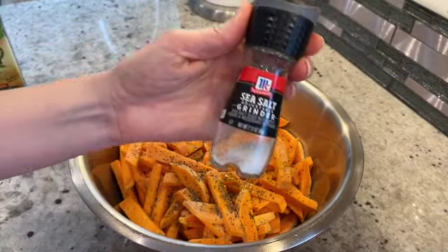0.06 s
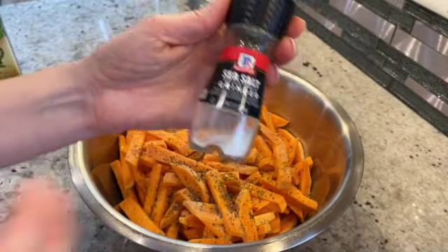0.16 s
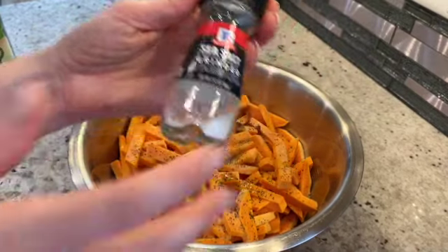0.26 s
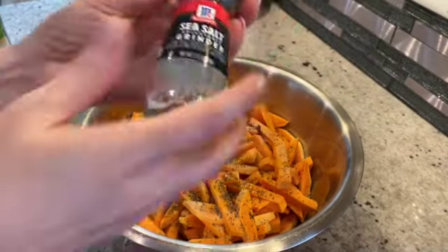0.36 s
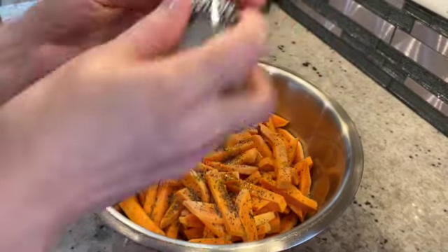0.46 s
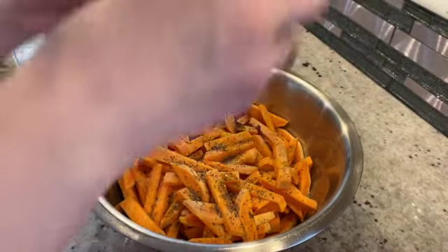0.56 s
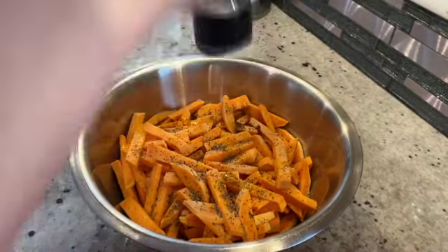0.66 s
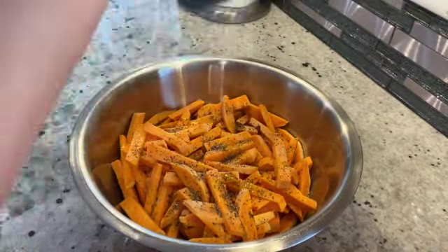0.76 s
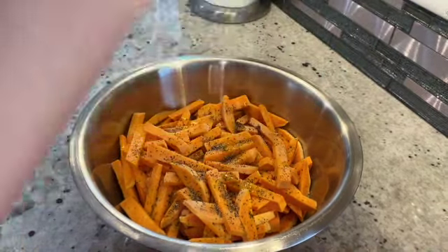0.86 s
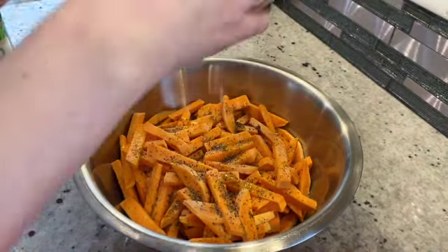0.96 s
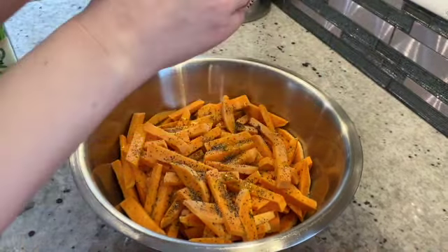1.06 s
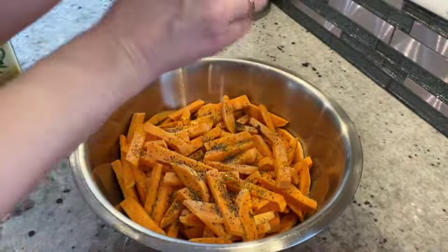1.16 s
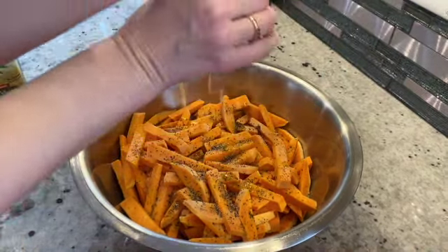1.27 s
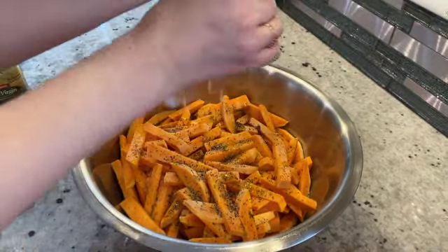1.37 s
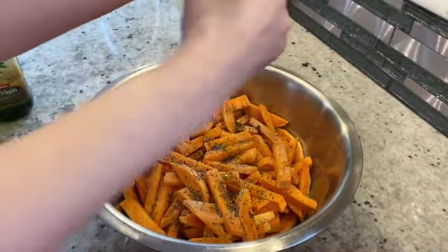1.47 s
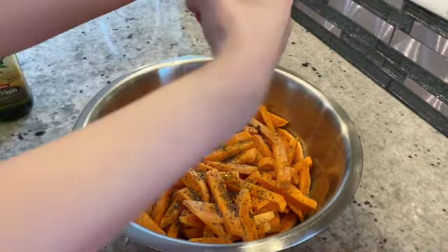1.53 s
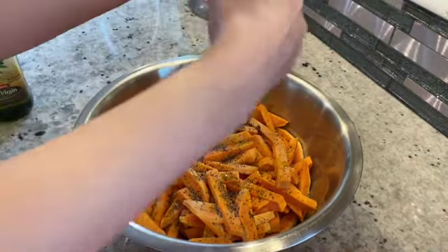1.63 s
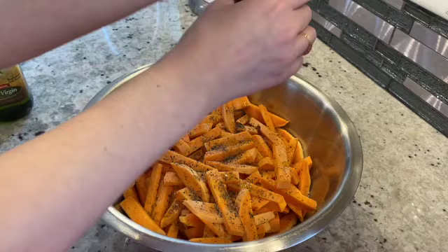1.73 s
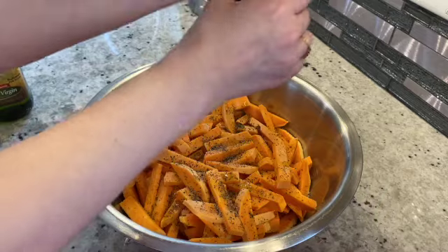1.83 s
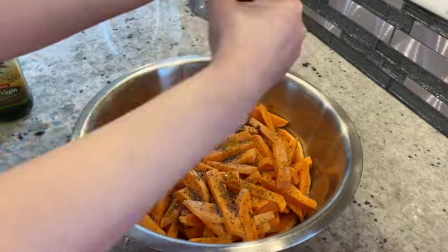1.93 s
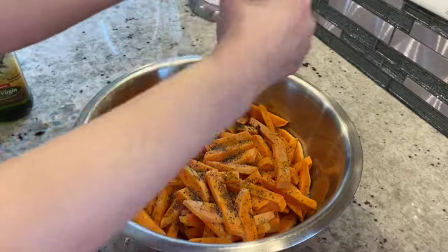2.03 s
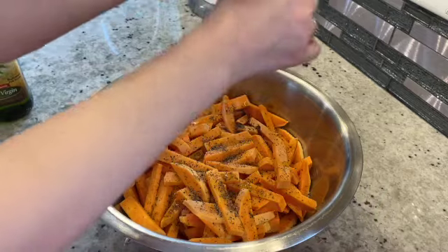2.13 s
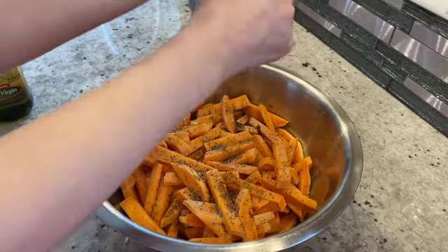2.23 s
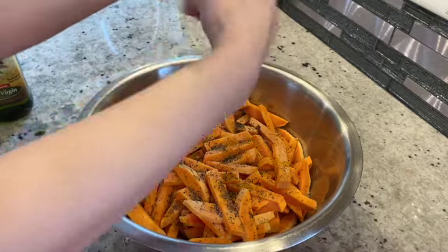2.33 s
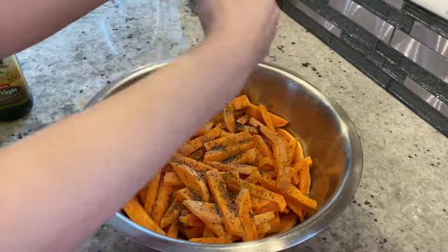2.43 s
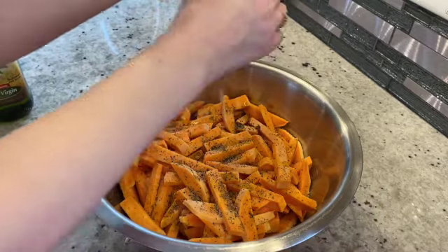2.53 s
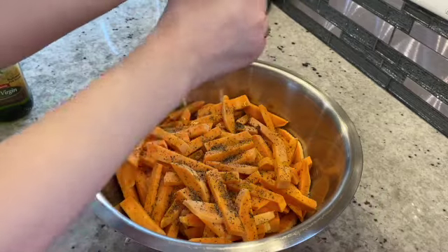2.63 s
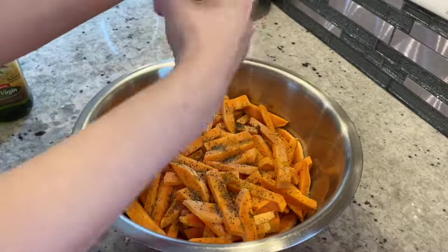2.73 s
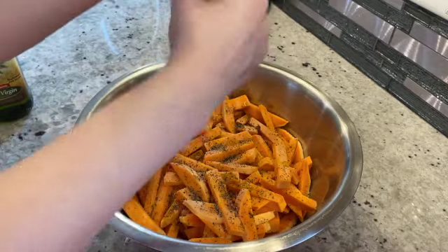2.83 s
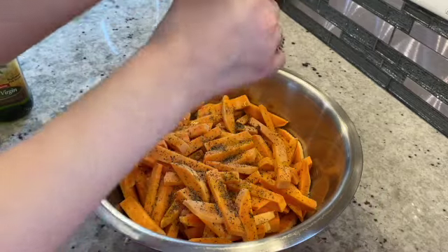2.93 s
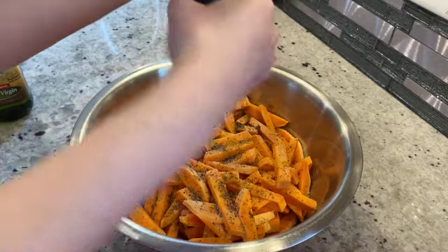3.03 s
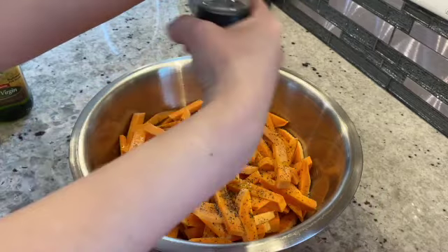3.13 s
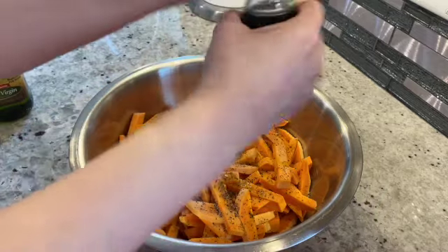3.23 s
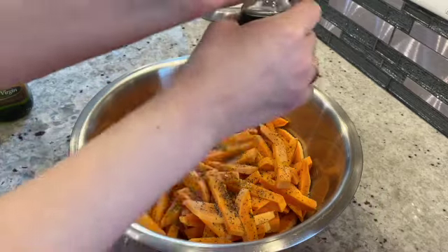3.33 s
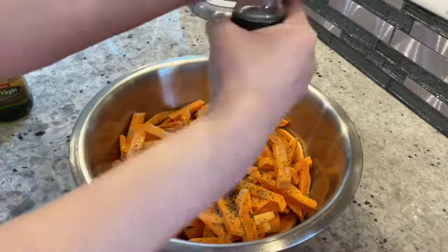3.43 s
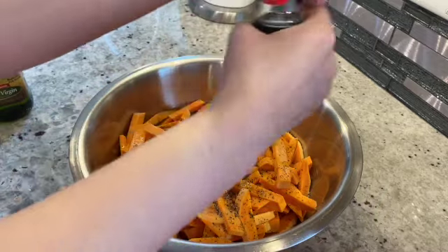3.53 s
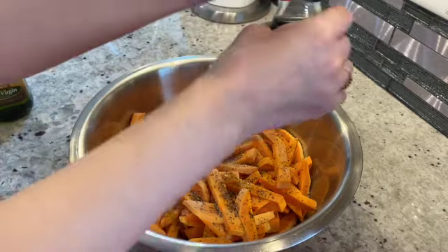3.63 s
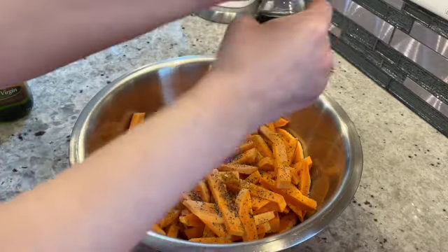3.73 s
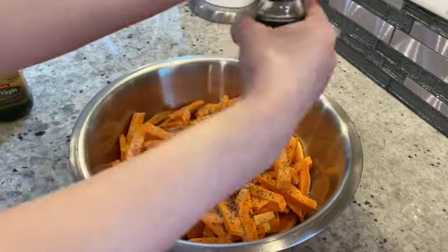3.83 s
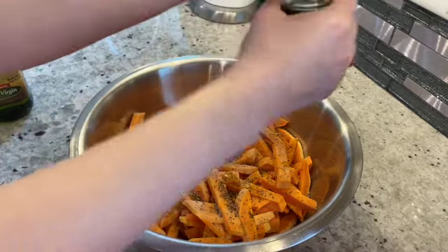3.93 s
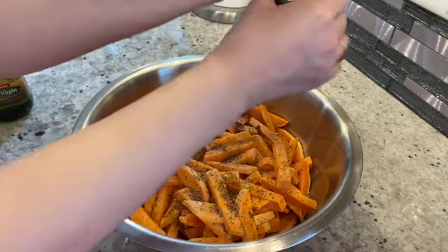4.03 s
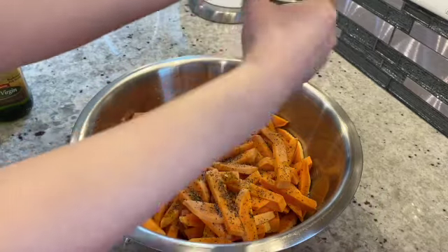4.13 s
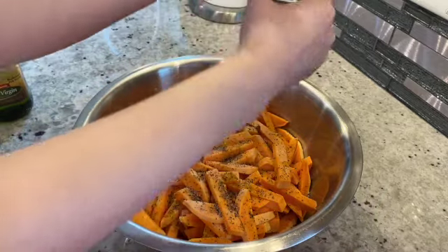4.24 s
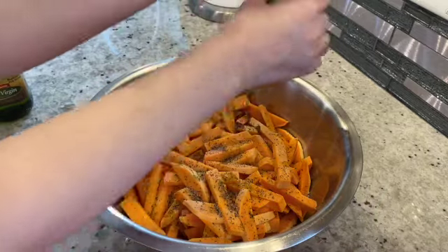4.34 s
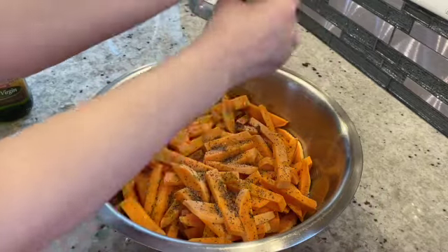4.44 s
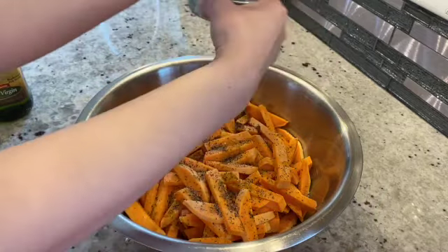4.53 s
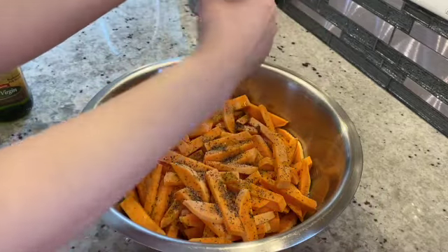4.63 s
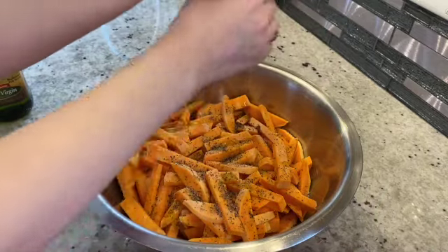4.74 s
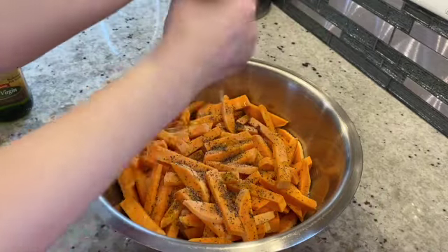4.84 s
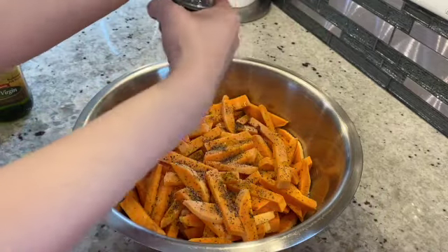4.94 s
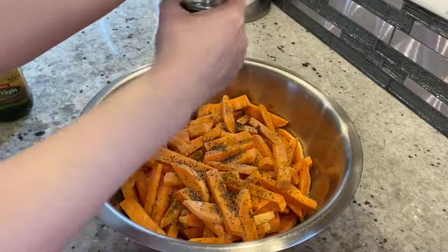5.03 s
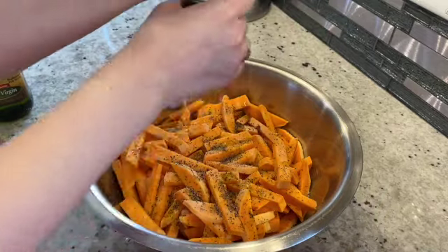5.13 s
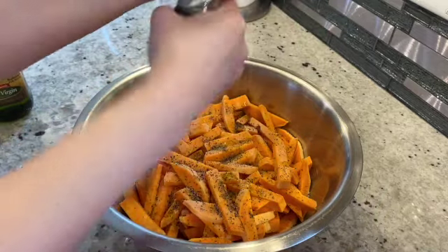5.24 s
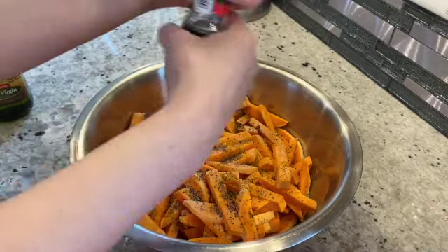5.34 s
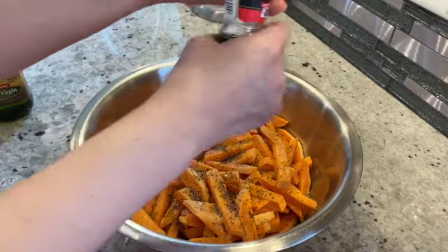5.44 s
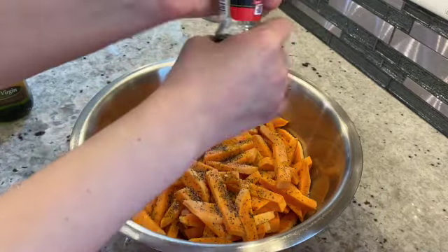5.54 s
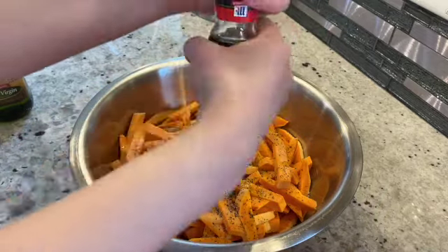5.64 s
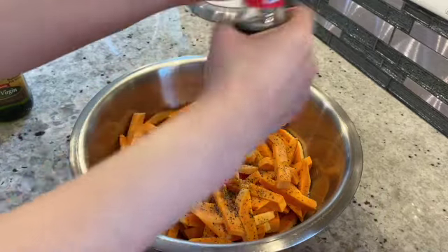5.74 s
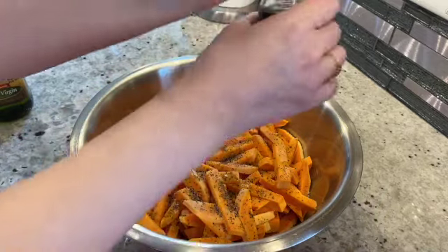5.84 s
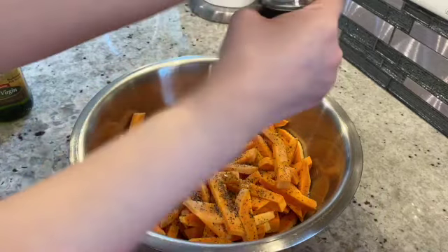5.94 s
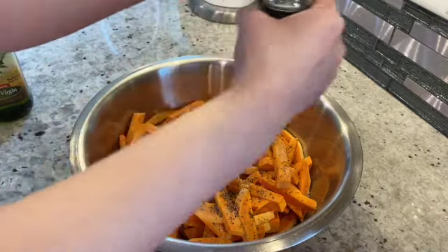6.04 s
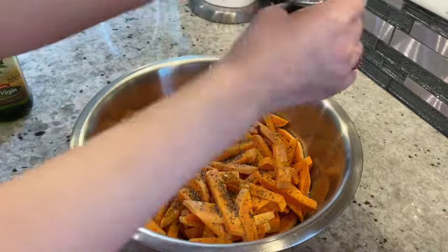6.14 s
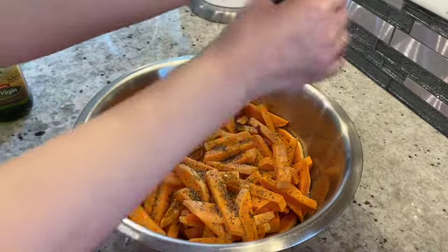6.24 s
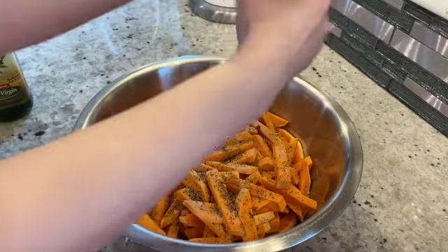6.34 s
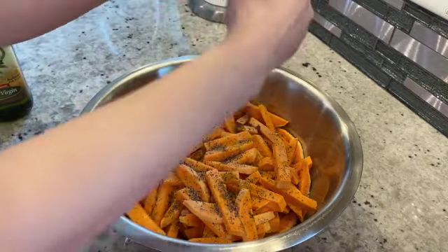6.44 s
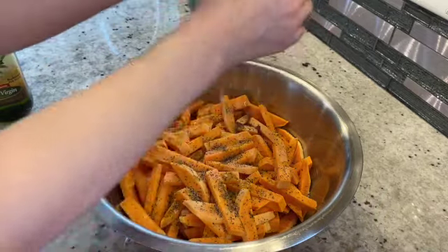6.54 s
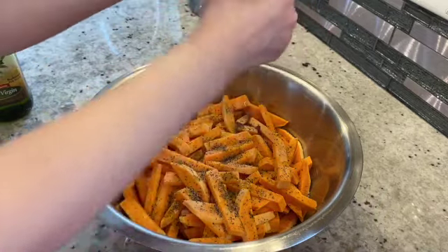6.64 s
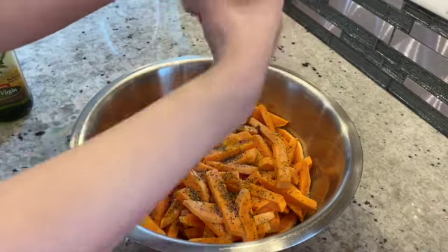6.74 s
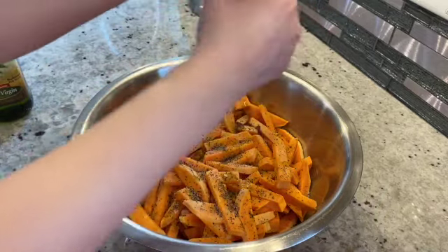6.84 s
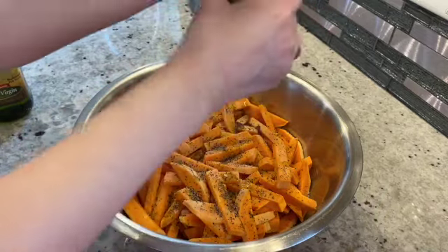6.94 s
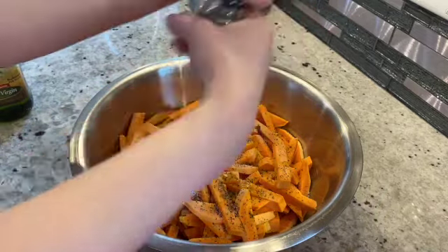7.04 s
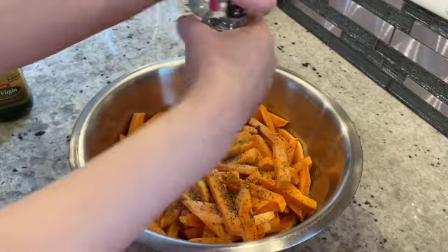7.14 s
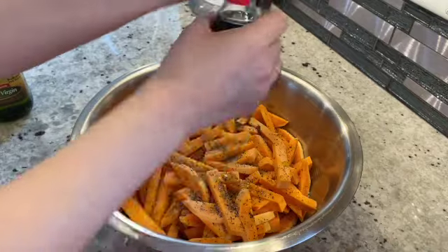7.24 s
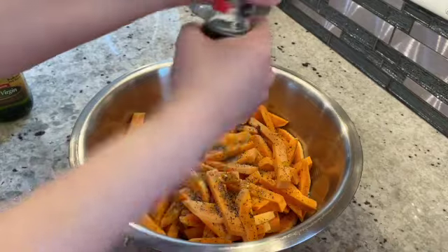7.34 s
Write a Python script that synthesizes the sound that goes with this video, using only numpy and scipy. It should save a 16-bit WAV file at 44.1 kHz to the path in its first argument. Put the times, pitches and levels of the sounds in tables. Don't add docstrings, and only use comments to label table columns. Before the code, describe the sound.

After a brief quiet moment and a rush of loose salt, a hand grinder rasps about three times a second over a low appliance hum.

```python
import sys
import numpy as np
from scipy import signal
from scipy.fft import rfft, irfft, next_fast_len
from scipy.io import wavfile
from scipy.ndimage import uniform_filter1d

SR = 44100
rng = np.random.default_rng(int(sys.argv[2]) if len(sys.argv) > 2 else 0)


def attenuation_scalar(level_db):
    decades = np.asarray(level_db, float) / 20
    return 10 ** decades


def unload_audio(sound):
    columns = np.transpose(np.atleast_2d(sound))
    steps = np.round(np.clip(columns, -1, 1) * 32767)
    wavfile.write(sys.argv[1], SR, steps.astype(np.int16))


N = 325899


def evened(x):
    return x / np.sqrt(np.mean(x ** 2) + 1e-20)


def read(points, hz, column=1):
    table = np.transpose(points)
    return np.interp(np.log(hz + 1), np.log(table[0] + 1), table[column])


def add(mix, s, sound):
    part = mix[..., round(s * SR):][..., :sound.shape[-1]]
    part += sound[..., :part.shape[-1]]


def resonate(x, hz, width_hz):
    return signal.lfilter(*signal.iirpeak(hz, hz / width_hz, SR), x)


def butter(kind, order, hz):
    return signal.butter(order, hz, kind, fs=SR, output="sos")


def coloured(x, db):
    log_gain = np.log(attenuation_scalar(np.r_[db, db[-2:0:-1]]))
    taps = np.fft.ifft(np.exp(np.conj(signal.hilbert(log_gain)))).real[:2048]
    return signal.oaconvolve(x, taps)[:N]


def drift(per_s):
    span = int(SR / per_s)
    return evened(uniform_filter1d(uniform_filter1d(rng.standard_normal(N), span), span))


def grains(per_s, spread_db, slips_per_s, slip_s, slip):
    slips = np.minimum(rng.exponential(1, N), 2) * (rng.random(N) < slips_per_s / SR)
    clumps = 1 + slip * signal.lfilter([1], [1, -np.exp(-1 / (slip_s * SR))], slips)
    size = attenuation_scalar(spread_db * np.minimum(rng.exponential(1, N), 4)) * clumps
    return evened(size * rng.standard_normal(N) * (rng.random(N) < per_s / SR))


def scatter(length):
    taps, at = np.zeros((2, length)), np.arange(20, length - 20, 20)
    at = at + rng.integers(0, 20, (2, len(at)))
    np.put_along_axis(taps, at, rng.choice([-1., 1.], at.shape), 1)
    return taps


# f/Hz, density/dB per Hz
AIR_SPECTRUM = [(12, -61), (20, -31), (76, 20), (206, -32.5), (228, -7.5), (300, -17.5), (448, -18.5),
                (575, -29), (1050, -30), (1380, -38.5), (1610, -34.5), (8000, -63), (10400, -100),
                (17600, -120)]
# f/Hz, correlation/1
AIR_LIKENESS = [(25, .99), (90, 1), (200, 0.62), (400, 0.74), (700, 0.11), (3000, 0.33), (8000, .5)]
AIR_DB = -58


def air():
    frames, hz = N // 256 + 5, np.fft.rfftfreq(1024, 1 / SR)
    a, b, c, d, patches = rng.standard_normal((frames, 513, 5)).T
    patches = evened(uniform_filter1d(uniform_filter1d(patches, 6, 0), 14, 1))
    same = np.clip(read(AIR_LIKENESS, hz), -1, 1)[:, None]
    left = a + 1j * b
    right = same * left + np.sqrt(1 - same ** 2) * (c + 1j * d)
    z = np.array([left, right])
    z *= attenuation_scalar(read(AIR_SPECTRUM, hz)[:, None] + 2.05 * patches) * (hz[:, None] > 90)
    return attenuation_scalar(AIR_DB) * evened(signal.istft(z, nperseg=1024, noverlap=768)[1][:, :N])


# t/s, level/dB
HUM_LEVEL = [(0, -54.5), (.75, -58.5), (1.19, -49), (1.6, -54.5), (1.93, -53), (2.15, -55.5), (2.4, -59),
             (2.55, -53), (3.6, -55), (3.75, -53), (4.35, -49), (4.65, -51.5), (4.95, -60), (5.1, -51),
             (5.4, -57.5), (5.6, -53.5), (6.7, -51.5), (7.39, -56)]
HUM_DIPS = [.08, .39, 1.11, 1.27, 1.63, 1.79, 2.0, 3.6, 5.5, 6.13, 6.38, 6.83, 7.08]
# f/Hz, width/Hz, level/dB
WHINE_LINES = [(252.6, 5.8, -70), (114.6, 5.4, -70), (305.8, 8.1, -71.5)]
HUM_HZ, HUM_WIDTH_HZ, HUM_THROB_DB = 68, 5.9, 1.3
DIP_DB, DIP_S = -10.5, 0.044


def appliance():
    t = np.arange(N) / SR
    wobble = 1 + 0.22 * drift(31)
    hum = np.cos(2 * np.pi * np.cumsum(HUM_HZ + 2.373 * drift(4.99)) / SR) * wobble
    rumble = evened(resonate(rng.standard_normal(N), HUM_HZ, 3 * HUM_WIDTH_HZ))
    hum = evened(hum + 0.46 * rumble)
    whine = np.zeros(N)
    for hz, width_hz, db in WHINE_LINES:
        line = resonate(rng.standard_normal(N), hz, width_hz)
        whine += attenuation_scalar(db) * evened(resonate(line, hz, width_hz))
    dips_db = sum(DIP_DB * np.exp(-((t - at) / DIP_S) ** 2) for at in HUM_DIPS)
    level_db = np.interp(t, *np.transpose(HUM_LEVEL))
    return hum * attenuation_scalar(dips_db + level_db + HUM_THROB_DB * drift(9)) + whine


# f/Hz, t60/s
KITCHEN_T60 = [(200, 0.78), (1000, 0.43), (4000, 0.44), (9000, 0.18), (16000, 0.06)]


def kitchen(x):
    hz, t, z = signal.stft(scatter(SR // 2), SR, nperseg=256)
    fade = attenuation_scalar(-60 * t / read(KITCHEN_T60, hz)[:, None])
    tail = signal.istft(z * fade, SR, nperseg=256)[1]
    return signal.fftconvolve(x, tail / np.linalg.norm(tail[0]), axes=1)[:, :N]


def bowl(x, count=4):
    place, out = np.arange(N) / SR * 28, np.zeros((2, N))
    t = np.arange(1500) / SR
    for k in range(count):
        away = (place - k + count / 2) % count - count / 2
        share = np.cos(np.pi / 2 * np.clip(away, -1, 1))
        echo = scatter(1500) * attenuation_scalar(-60 * t / 0.031)
        echo /= np.linalg.norm(echo, axis=1, keepdims=True)
        out += signal.oaconvolve(x * share, echo, axes=1)[:, :N]
    return out


# f/Hz, left-right/dB, left lead/rad
PORT_OFFSETS = [(300, 0.5, -0.12), (723, -4, -1.54), (1200, -3, 0.68), (2200, 3.5, 0.5), (3280, 2, 0.83),
                (4300, 5, -0.088), (5600, 6.5, -0.3), (7000, 1, -0.39), (8900, 7, 1), (15000, -0.9, 0.086)]


def ports(x):
    size = next_fast_len(N, True)
    hz = np.fft.rfftfreq(size, 1 / SR)
    half = attenuation_scalar(read(PORT_OFFSETS, hz) / 2) * np.exp(.5j * read(PORT_OFFSETS, hz, column=2))
    return irfft(rfft(x, size) * np.array([half, 1 / half]), size)[:, :N]


# t/s, peak/dB, f/Hz, t60/s
KNOCK_EVENTS = [
    (6.2105, -37, 1400, 0.0032),
    (6.247, -38, 1100, .004),
    (1.425, -44, 220, 0.082),
    (1.445, -41, 210, 0.099),
    (1.87, -43.5, 220, .08),
]
# t/s, level/dB
SLIDE_LEVEL = [
    (.715, -80),
    (.74, -39),
    (.8, -56),
    (.9, -82),
]
SLIDE_HZ, SLIDE_WIDTH_HZ = 4400, 1800


def handling():
    s, db = np.transpose(SLIDE_LEVEL)
    grit = grains(per_s=9000, spread_db=-1.5, slips_per_s=54, slip_s=0.0036, slip=.4)
    rush = resonate(resonate(grit, SLIDE_HZ, SLIDE_WIDTH_HZ), SLIDE_HZ, SLIDE_WIDTH_HZ)
    out = evened(rush) * attenuation_scalar(np.interp(np.arange(N) / SR, s, db, left=-120, right=-120))
    t = np.arange(4000) / SR
    for s, db, hz, t60_s in KNOCK_EVENTS:
        add(out, s, np.sin(2 * np.pi * hz * t) * attenuation_scalar(db - 60 * t / t60_s))
    return out


# f/Hz, level/dB, t60/s
TAP_MODES = [(8140, 3, 0.015), (8560, -35, 0.33), (8340, -27, 0.15), (8140, -34, .2), (4300, 8, 0.0019),
             (1900, -18.5, .002), (900, -34, 0.0036), (6500, 4, 0.0011), (12000, -14.5, .003)]
TAP_S, TAP_DB = 4.3574, -17


def tap():
    out, t = np.zeros(N), np.arange(SR // 4) / SR
    modes = sum(attenuation_scalar(db - 60 * t / t60_s) * np.sin(2 * np.pi * hz * t) for hz, db, t60_s in TAP_MODES)
    sound = modes * attenuation_scalar(TAP_DB)
    add(out, TAP_S, sound)
    add(out, TAP_S + 0.008, sound * attenuation_scalar(-24))
    return out


# t/s, peak/dB, ring f/Hz
SPLIT_CRYSTALS = [(1.3416, -15, 4600), (1.3574, -12, 5940), (1.3714, -16, 6450), (1.4195, -9.5, 4540),
                  (1.4390, -10, 4020), (1.8772, -16.5, 4500), (1.927, -18, 2030), (1.963, -22.5, 3780),
                  (2.2799, -16, 2050), (2.3005, -18, 2130), (2.6934, -13, 4300), (2.741, -24, 4260),
                  (2.8384, -35.5, 4750), (2.8923, -46, 6400), (3.036, -13, 2250), (3.0783, -16, 7360),
                  (3.7658, -18, 7500), (4.092, -15, 7000), (4.4621, -16, 6740), (4.5182, -19, 4300),
                  (4.561, -28, 4400), (4.912, -22, 4520), (5.2348, -10, 7340), (5.2731, -17, 3960),
                  (5.5935, -15, 7040), (5.9204, -19, 4970), (6.349, -12.5, 5240), (6.6907, -16, 5160),
                  (7.0238, -10.5, 5430), (7.3698, -16.5, 6700),
                  (1.3186, -23, 6200), (1.8425, -15.5, 4070), (1.8615, -15, 4150), (2.2256, -22, 1770),
                  (2.6397, -23, 1710), (2.9881, -25, 2200), (3.3542, -25, 6800), (3.3599, -20.5, 4970),
                  (3.39, -18, 6770), (3.713, -32, 4740), (3.7454, -17.5, 4280), (4.0622, -20, 7450),
                  (4.4212, -18.5, 6800), (5.19, -28, 7280), (5.5496, -29, 7150), (5.5633, -20, 2350),
                  (5.8911, -31, 4980), (6.6199, -22.5, 5200), (6.2653, -21, 7200), (6.9668, -19.5, 7360),
                  (7.318, -22.5, 7140)]
CRACK_PAN_DB, CRACK_SCATTER_DB = 4.0, 4.0
BURST_DB, BURST_T60_S = -9.5, .035


def cracks():
    out, t = np.zeros((2, N)), np.arange(900) / SR
    rows = SPLIT_CRYSTALS
    sides = rng.standard_normal(len(rows))
    splinters = signal.sosfilt(butter("high", 2, 1500), rng.standard_normal((len(rows), 900)))
    burst = attenuation_scalar(-60 * t / 0.0075) + attenuation_scalar(BURST_DB - 60 * t / BURST_T60_S)
    for (s, db, hz), side, noise in zip(rows, sides, splinters):
        tone = np.sin(2 * np.pi * hz * t)
        tick = 1.1 * tone * attenuation_scalar(-60 * t / .001)
        tick -= uniform_filter1d(tick, 25)
        ring = 0.32 * tone * attenuation_scalar(-60 * t / 0.016)
        sound = tick + ring + 0.44 * noise * burst
        pan_db = (CRACK_PAN_DB + CRACK_SCATTER_DB * side) * np.array([[.5], [-.5]])
        add(out, s, sound * attenuation_scalar(db + 1.5 + pan_db))
    return out


TRICKLE_RISE, TRICKLE_FIZZ_DB = .45, -1
DULL_FIZZ_PER_JAR = -0.68


def trickle(t, peak_s, fall_s, level_db, jar_db):
    away = np.where(t < peak_s, (peak_s - t) / TRICKLE_RISE, t - peak_s) / fall_s
    fizz_db = TRICKLE_FIZZ_DB + DULL_FIZZ_PER_JAR * max(jar_db + 6.5, 0)
    return level_db - 20 * away, jar_db + 0 * t, fizz_db + 0 * t


# t/s, jar share/dB
GRIP_OPENNESS = [(1.4, -6.5), (2.3, 1), (2.7, -6), (3.4, -9), (4.1, -9.5), (4.5, -6.5), (5.2, -9.5),
                 (5.55, -7.5), (7.2, -11.5)]
CREEP_DB, CREEP_DB_PER_S = -29.5, 650
SAG_DB = -5
LET_GO_S, LET_GO_DB, SETTLE_DB_PER_S = .055, -19, 148
PUSH_FIZZ_DB, FIZZ_FADE_DB, JAR_LINGER_DB = -5.5, -5.5, 1.5
FIZZ_PER_JAR = 0.64


def stroke(t, start_s, hardest_s, length_s, push_db, bite_db):
    u, jar_db = t - start_s, np.interp(start_s, *np.transpose(GRIP_OPENNESS))
    gone = np.clip((u - length_s) / LET_GO_S, 0, 1)
    swell_db = bite_db * np.clip(1 - u / hardest_s, 0, 1) ** 1.51
    sag_db = SAG_DB * np.clip((u - hardest_s) / (length_s - hardest_s), 0, 1)
    after_db = LET_GO_DB * gone - SETTLE_DB_PER_S * np.maximum(u - length_s - LET_GO_S, 0)
    level_db = np.where(u < 0, CREEP_DB + CREEP_DB_PER_S * u, swell_db + sag_db + after_db)
    fizz_db = PUSH_FIZZ_DB + FIZZ_PER_JAR * jar_db + FIZZ_FADE_DB * gone
    return push_db + level_db, jar_db + JAR_LINGER_DB * gone, fizz_db


# start t/s, hardest after/s, let go after/s, push/dB, first bite re push/dB
TWISTS = [(1.32, 0.13, 0.19, -25.5, -14), (1.840, 0.025, .10, -30, -5), (2.219, 0.072, .11, -33.5, -6.5),
          (2.622, 0.037, .10, -31, -10.5), (2.975, 0.062, .11, -31, -8.5), (3.351, 0.051, 0.071, -26, -12),
          (3.704, 0.053, .09, -30.5, -12), (4.059, 0.039, 0.083, -30, -6), (4.419, 0.06, .10, -30.5, -9),
          (4.799, .04, 0.088, -30, -13), (5.187, .052, 0.083, -29, -19), (5.544, 0.042, .085, -31, -11),
          (5.888, 0.041, 0.089, -28, -18), (6.259, 0.034, 0.09, -29.5, -10),
          (6.599, 0.039, 0.099, -30, -14), (6.954, 0.046, 0.085, -28, -9.5),
          (7.306, 0.052, 0.068, -26, -14.5)]
# peak t/s, 20 dB fall/s, level/dB, jar share/dB
SALT_TRICKLES = [(.225, 0.16, -71.5, -17), (.44, 0.47, -77.5, 10.5), (.46, 0.17, -71, -8),
                 (0.745, 0.05, -40.5, -29), (1.002, 0.15, -65, -21), (1.06, 0.1, -68, -15),
                 (1.18, 0.7, -68.5, -8), (1.68, .22, -59.5, -6.5), (2.208, .03, -61.5, -9),
                 (2.45, 0.31, -59, -8.5), (2.83, 0.5, -73, 1), (3.2, .22, -56.5, -6), (3.9, .2, -59.5, -10),
                 (4.385, 0.1, -63.5, 6), (4.65, 0.36, -62.5, -9), (5.08, 0.33, -62, -5),
                 (5.75, 0.22, -57.5, -8), (6.245, 0, -62, -3), (6.48, 0.3, -62, -8),
                 (6.84, 0.3, -59.5, -11), (7.2, 0.26, -58.5, -9)]


def hand():
    t = np.arange(0, N + 88, 88) / SR
    moves = [stroke(t, *row) for row in TWISTS] + [trickle(t, *row) for row in SALT_TRICKLES]
    level, jar, fizz = np.transpose(moves, (1, 0, 2))
    total = [10 * np.log10((attenuation_scalar(level + share) ** 2).sum(0) + 1e-12) for share in (0, jar, fizz)]
    curves = total[0], total[1] - total[0], total[2] - total[0]
    return np.array([np.interp(np.arange(N) / SR, t, curve) for curve in curves])


# f/Hz, level/dB
GRIT_COLOUR = [(45, -41), (150, -4), (350, -5), (750, -23.5), (1050, -18.5), (1400, -15), (1900, -7.5),
               (2600, -4.5), (4500, -7.5), (6000, -6.5), (7200, -3), (9500, -0.5), (13000, 0.5), (15500, 0)]
# f/Hz, width/Hz, level/dB
JAR_MODES = [(602.6, 41, -15.5), (1715, 57, -12.5), (2266, 176, -2.5), (3030, 310, -11.5),
             (1100, 130, -21.5), (4400, 600, -7), (5080, 500, -6.5), (7050, 1560, -2.5), (8200, 700, -11.5)]


def crunch():
    crunch_db, jar_db, fizz_db = uniform_filter1d(hand(), 260)
    slip = .5 * np.clip((crunch_db + 50) / 20, .2, 1)
    grit = grains(per_s=11000, spread_db=2.5, slips_per_s=90, slip_s=0.0028, slip=slip)
    spot = rng.integers(0, len(JAR_MODES), N)
    rings = np.zeros(N)
    for k, (hz, width_hz, db) in enumerate(JAR_MODES):
        damping_db = 2.46 * drift(18.5)
        rings += attenuation_scalar(db + damping_db) * evened(resonate(grit * (spot == k), hz, width_hz))
    colour_db = read(GRIT_COLOUR, np.fft.rfftfreq(4096, 1 / SR))
    body = evened(coloured(grit, colour_db)) + attenuation_scalar(-8.0) * evened(rings)
    under = [signal.sosfiltfilt(butter("low", 3, hz), body) for hz in (850, 3200, 8000)]
    thud, jar = under[0], under[1] - under[0]
    middle, fizz = under[2] - under[1], body - under[2]
    thud_db = -19.5 + 0.092 * (crunch_db + 39.0)
    mix = evened(middle) + evened(thud) * attenuation_scalar(thud_db)
    mix += evened(jar) * attenuation_scalar(jar_db + 1.4) + evened(fizz) * attenuation_scalar(fizz_db + 8.5)
    return mix * attenuation_scalar(crunch_db + 0.27)


def scene():
    mill = crunch() + tap() + cracks() + handling()
    bright = signal.sosfilt(butter("high", 2, 400), mill)
    near = ports(mill) + attenuation_scalar(-1.0) * bowl(bright) + attenuation_scalar(-15.0) * kitchen(bright)
    return attenuation_scalar(-4.0) * near + air() + appliance()


def roll_off(x):
    return signal.sosfilt(signal.butter(12, 16970, fs=SR, output="sos"), x)


# low f/Hz, high f/Hz
REVERSED_BANDS = [(8400, 9837), (12700, 14240)]
EDGE_HZ = 15800
JOINED_HZ = 6400
LOOSE_HZ = 520


def record(dry):
    dry = signal.oaconvolve(dry, signal.firwin(301, EDGE_HZ, window=("kaiser", 5), fs=SR)[None], "same")
    hz, t, (left, right) = signal.stft(dry, SR, nperseg=1024)
    band_hz = (np.round(hz / 345) * 345)[:, None]
    wander_hz = uniform_filter1d(rng.standard_normal((len(t), 8)), 5, 0).T * 450

    def inside(margin_hz, jumps_hz):
        hit = False
        for k, (low, high) in enumerate(REVERSED_BANDS):
            above = band_hz > low - margin_hz + jumps_hz[2 * k]
            hit = hit | (above & (band_hz < high + margin_hz + jumps_hz[2 * k + 1]))
        return hit

    flipped, loose = inside(0, wander_hz[:4]), inside(LOOSE_HZ, wander_hz[4:])
    treble_db = 10 * np.log10((abs(left[hz > JOINED_HZ]) ** 2).sum(0) + 1e-14)
    sudden = abs(np.gradient(treble_db)) > 5.5
    joined = (band_hz > JOINED_HZ + wander_hz[0]) & (flipped | ~loose) & ~sudden
    right = np.where(joined, left * (1 - 2 * flipped), right)
    mix = signal.istft(np.array([left, right]), SR, nperseg=1024)[1][:, :N]
    return roll_off(mix)


dry = scene()
out = record(dry)
unload_audio(out)
```